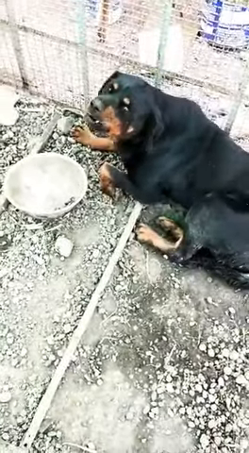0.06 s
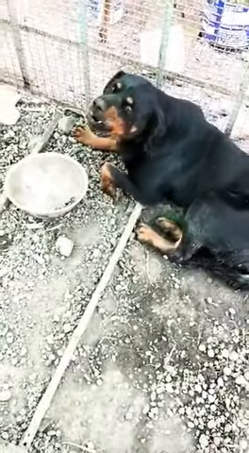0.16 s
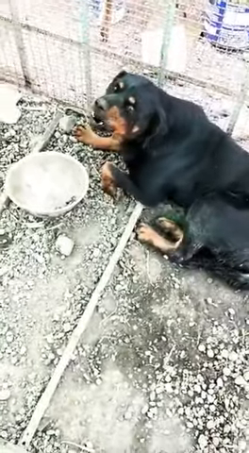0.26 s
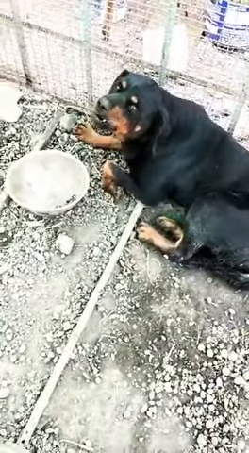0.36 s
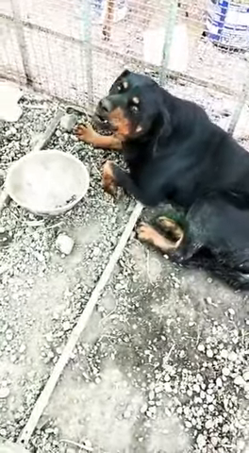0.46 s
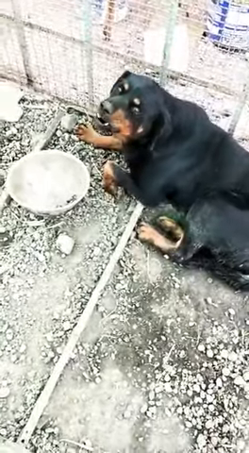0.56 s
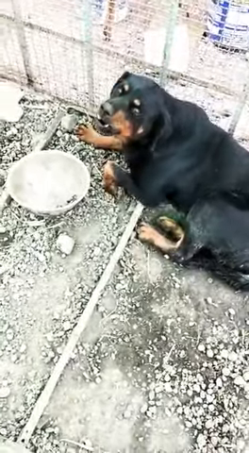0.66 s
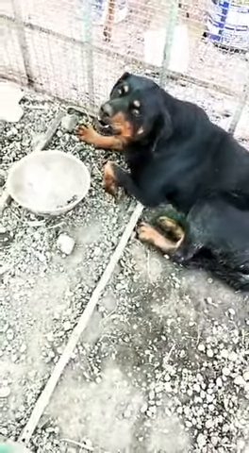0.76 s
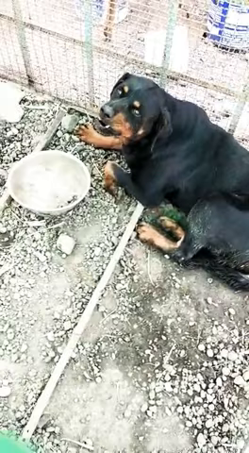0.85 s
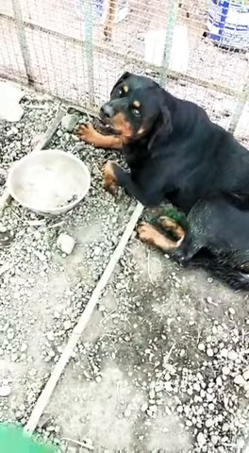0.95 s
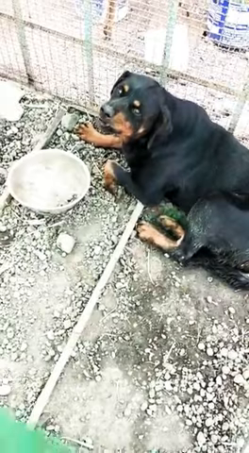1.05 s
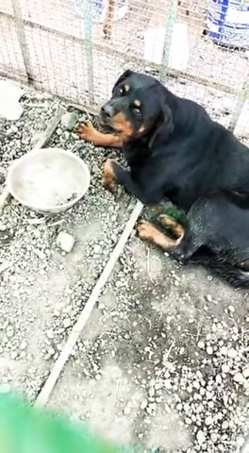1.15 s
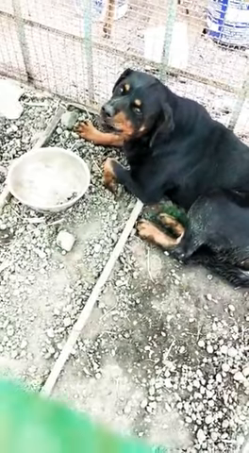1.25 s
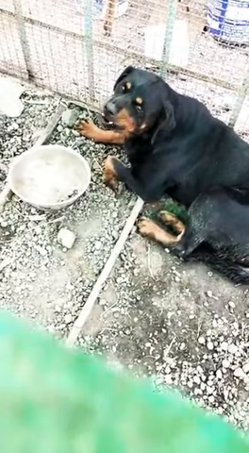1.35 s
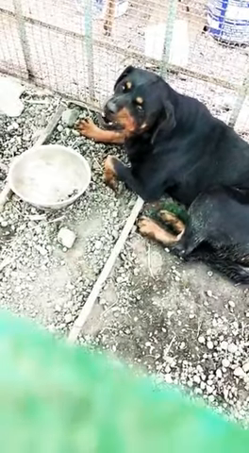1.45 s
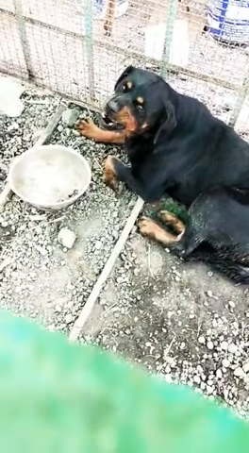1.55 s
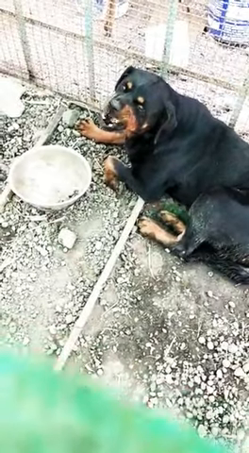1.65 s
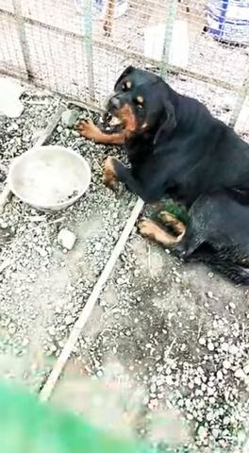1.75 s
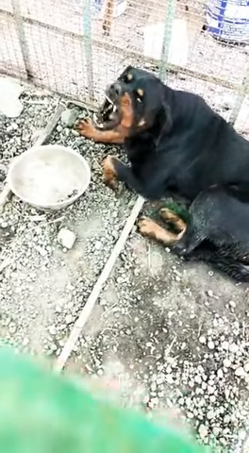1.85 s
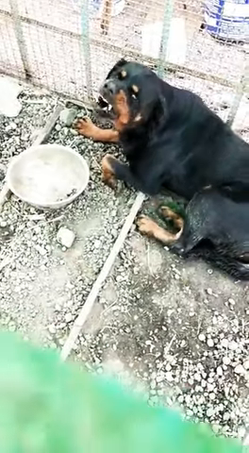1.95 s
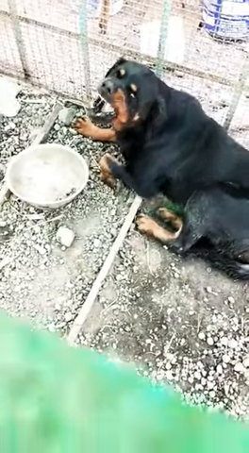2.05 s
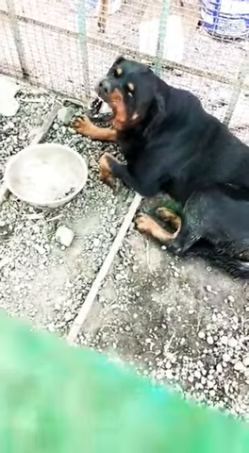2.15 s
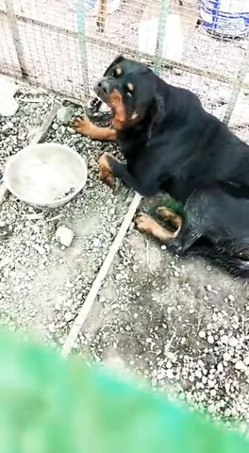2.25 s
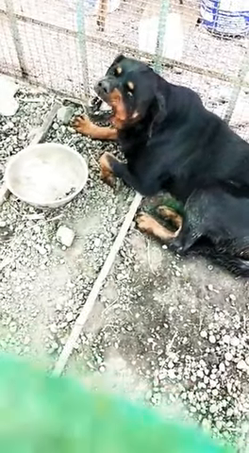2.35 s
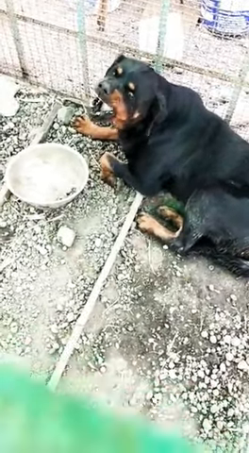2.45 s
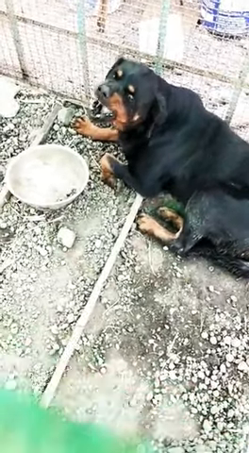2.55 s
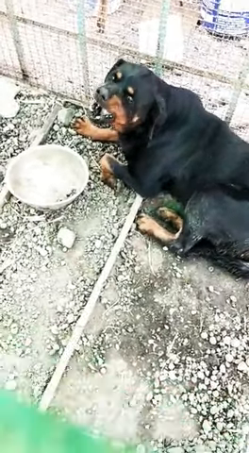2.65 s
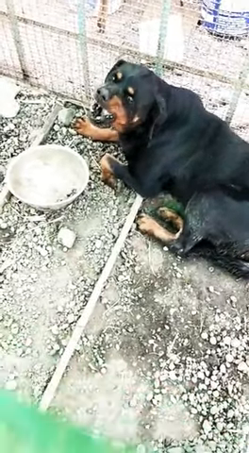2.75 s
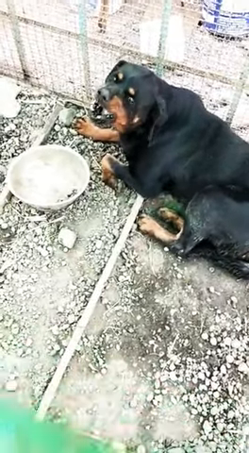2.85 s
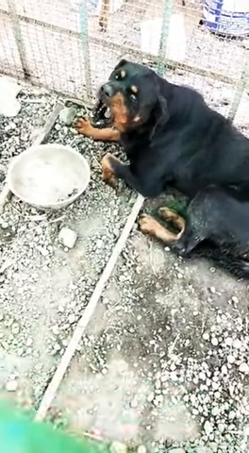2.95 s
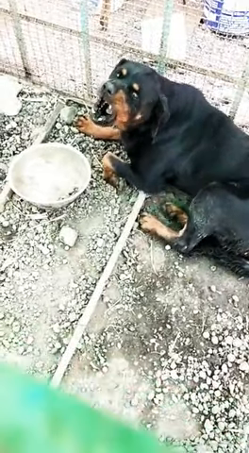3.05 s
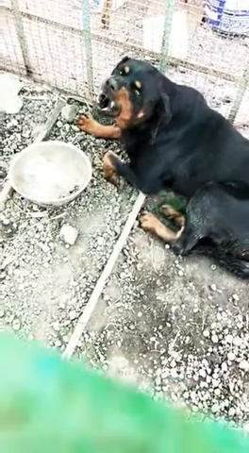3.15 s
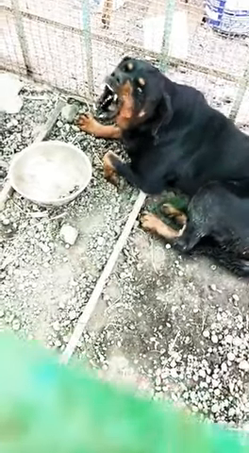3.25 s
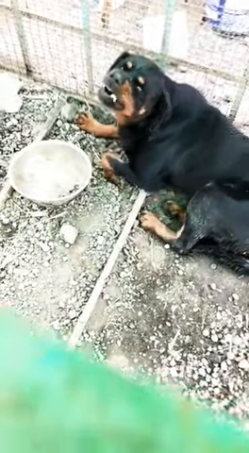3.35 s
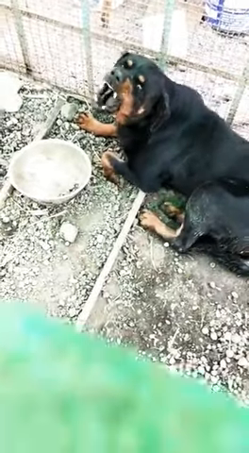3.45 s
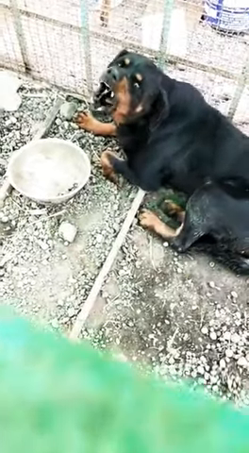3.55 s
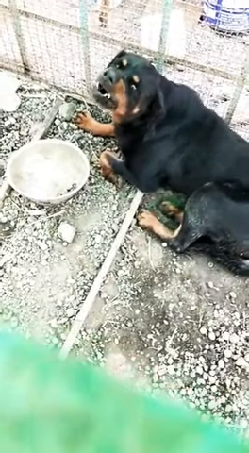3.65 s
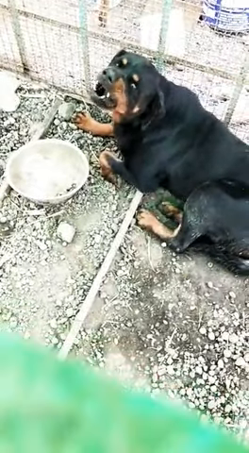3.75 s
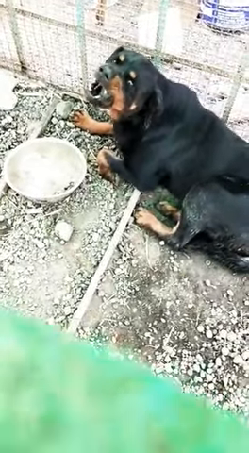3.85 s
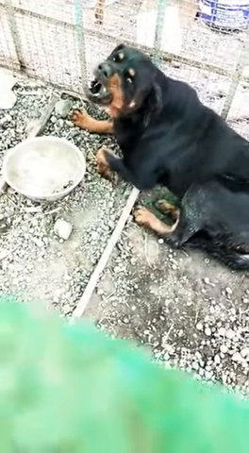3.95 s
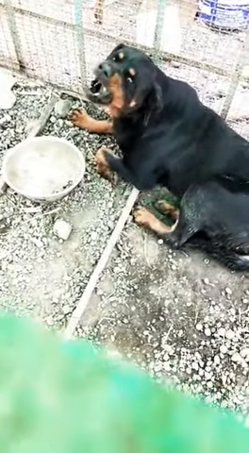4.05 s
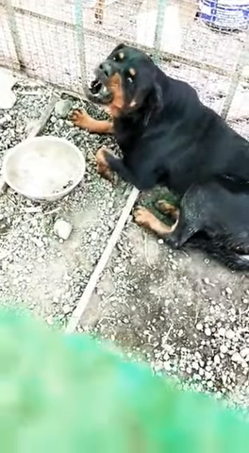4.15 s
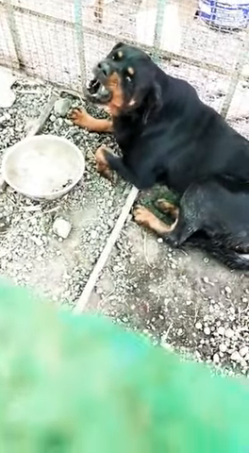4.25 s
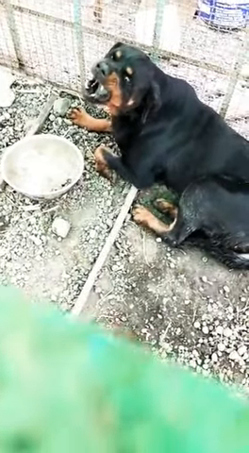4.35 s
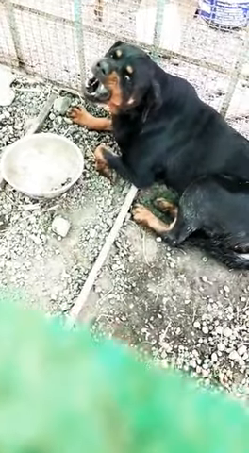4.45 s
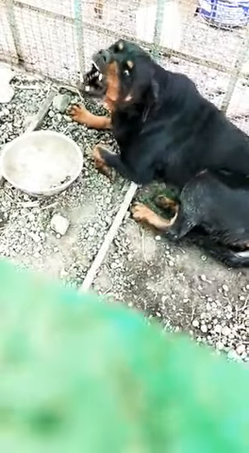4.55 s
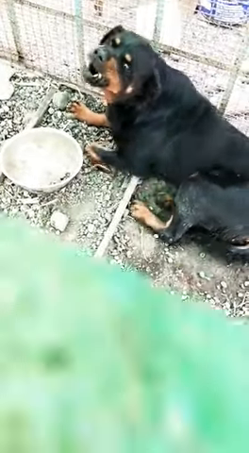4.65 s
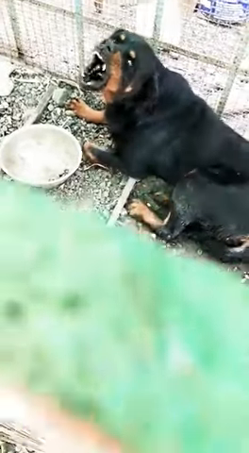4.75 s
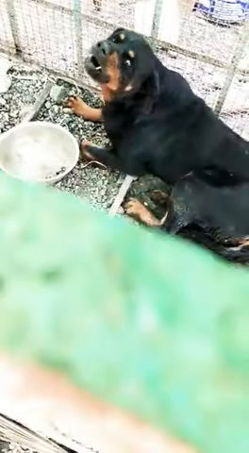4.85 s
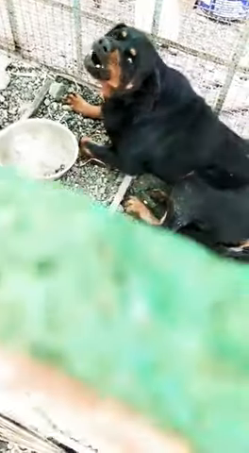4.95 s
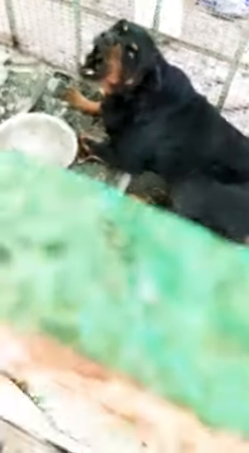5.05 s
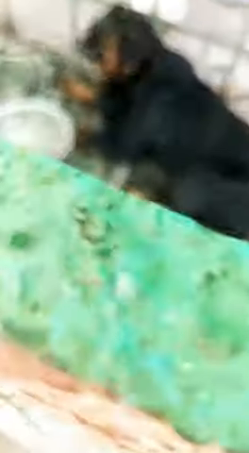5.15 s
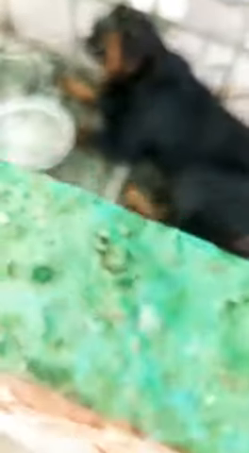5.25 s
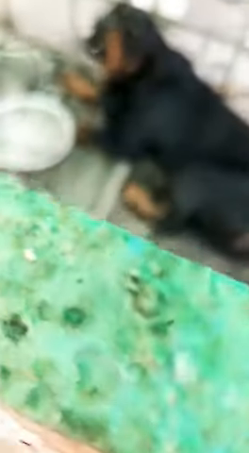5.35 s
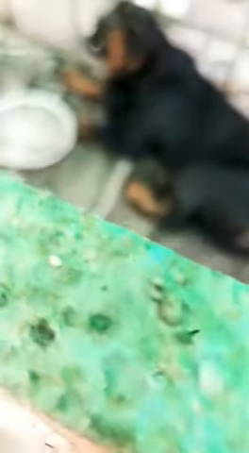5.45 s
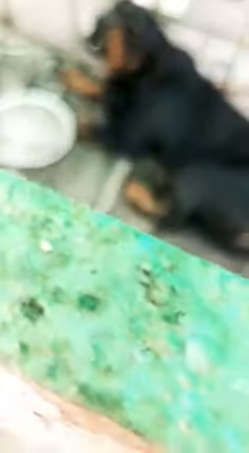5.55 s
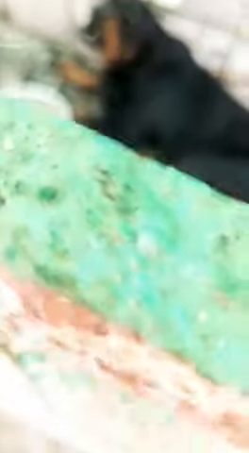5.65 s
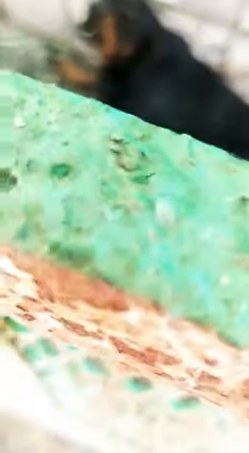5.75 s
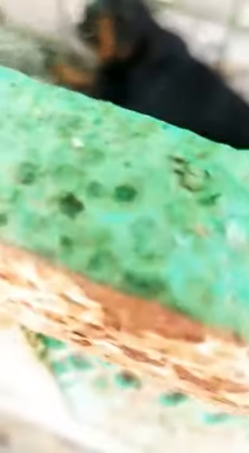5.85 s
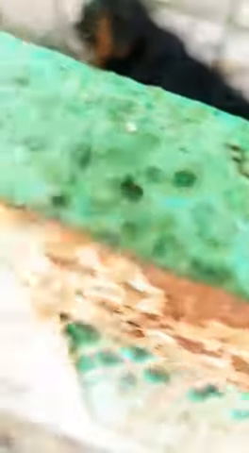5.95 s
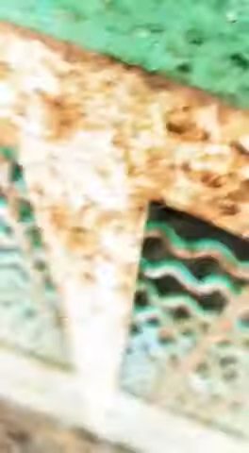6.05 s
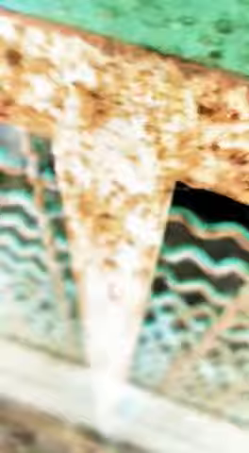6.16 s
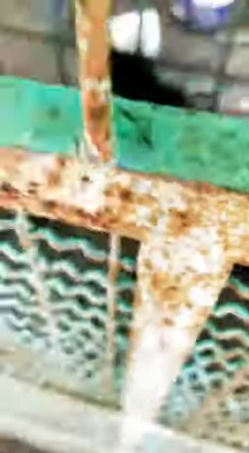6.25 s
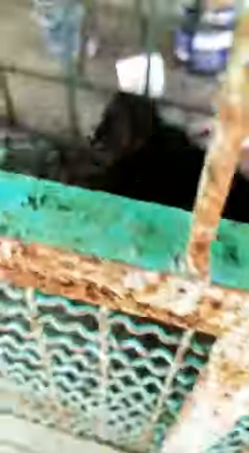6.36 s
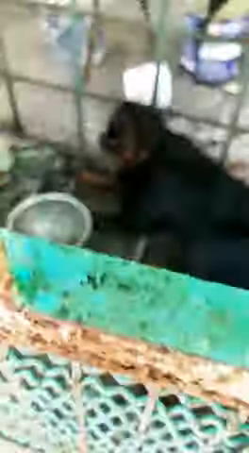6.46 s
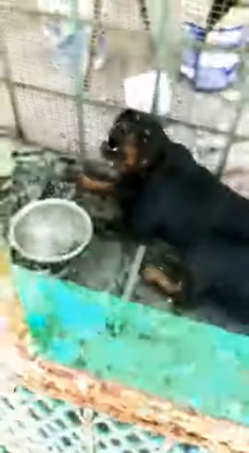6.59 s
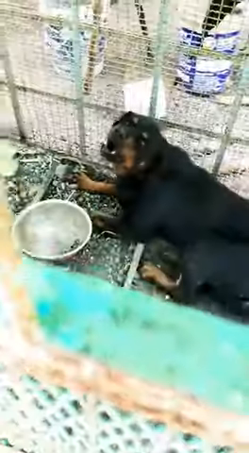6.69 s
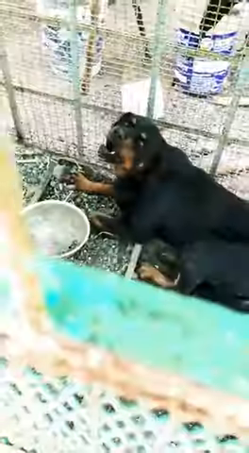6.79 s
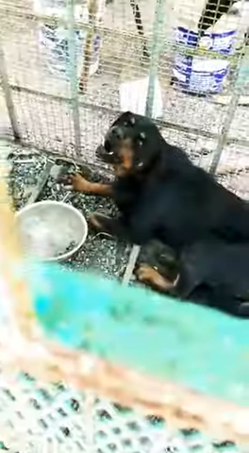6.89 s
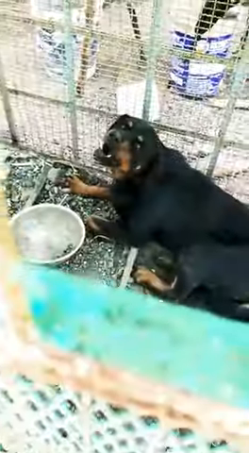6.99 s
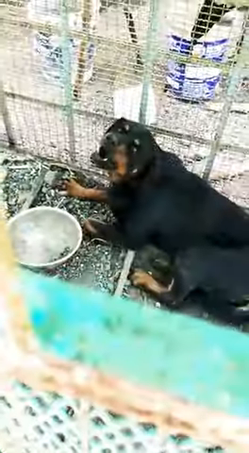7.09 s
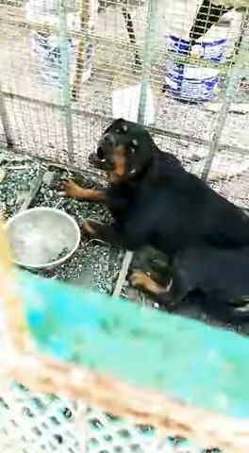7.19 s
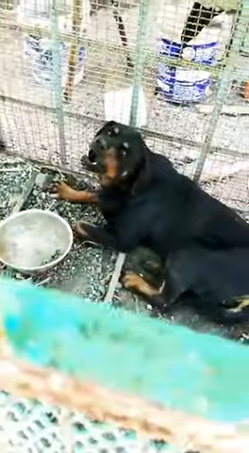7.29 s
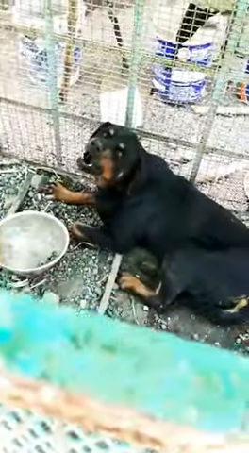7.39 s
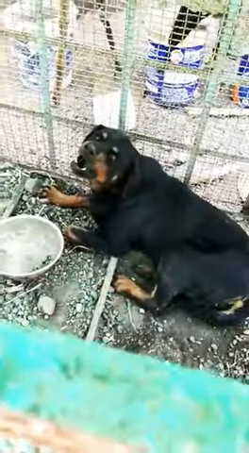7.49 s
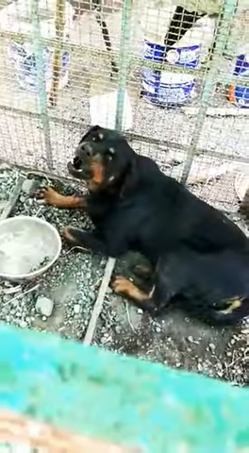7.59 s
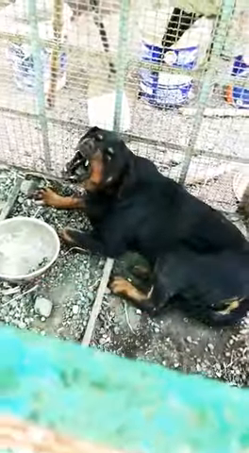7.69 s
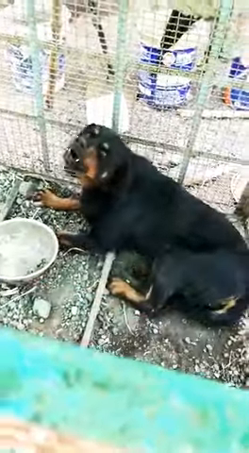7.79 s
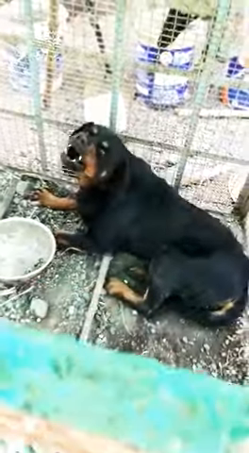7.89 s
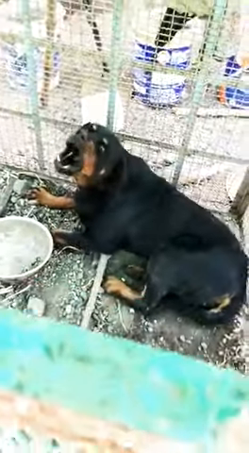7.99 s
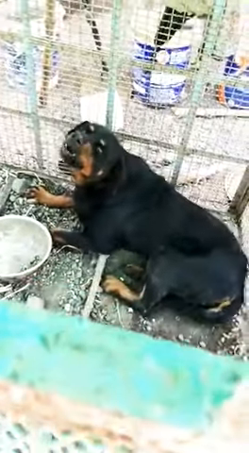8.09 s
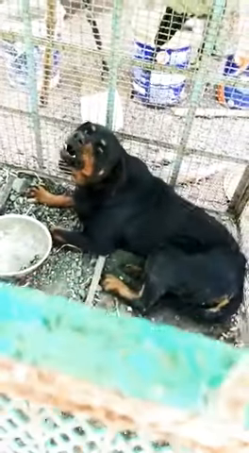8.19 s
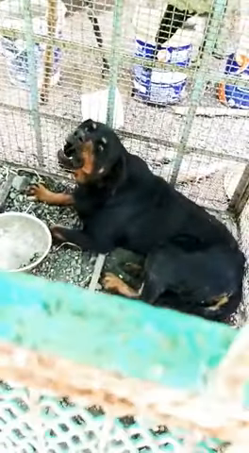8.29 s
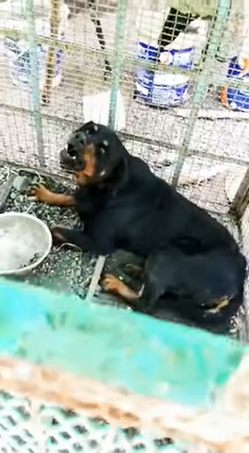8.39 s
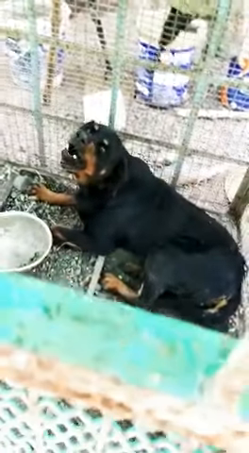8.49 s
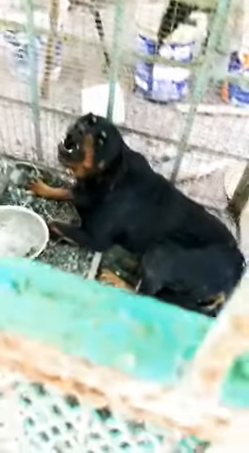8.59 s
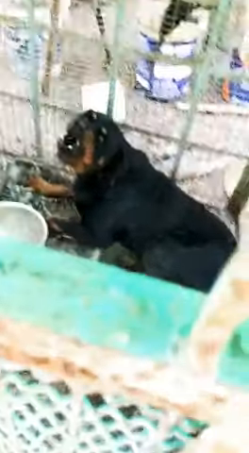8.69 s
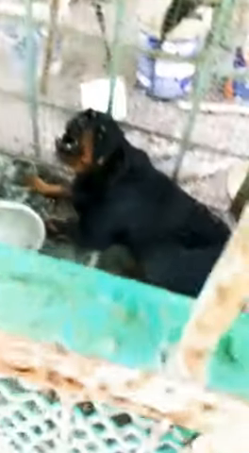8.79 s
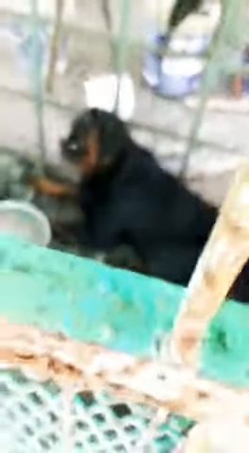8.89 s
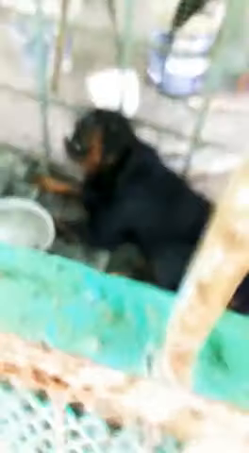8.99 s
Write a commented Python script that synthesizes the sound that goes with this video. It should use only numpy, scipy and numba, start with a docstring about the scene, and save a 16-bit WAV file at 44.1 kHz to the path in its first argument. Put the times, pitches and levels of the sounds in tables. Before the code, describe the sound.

Deep rough barks alternate with low throaty snarls from a big dog, while grit scrapes and dull close knocks gather near the end.

```python
"""A large dog in a wire pen barks and growls in turns, heard by the two microphone ports of a hand-held phone.
Barks are pulse trains with an arched pitch that turn rough; growls are a low hum under ragged throat pulses.
Ringing resonances shape both, and a metal bowl rings along. Noise makes gravel scuffs and short close ticks.
The pen adds a short scattered echo, and a faint steady noise fills the yard."""
import sys
import numpy as np
from scipy import signal
from scipy.fft import rfft, irfft
from scipy.io import wavfile
from scipy.ndimage import uniform_filter1d, map_coordinates
from numba import njit

SR = 44100
rng = np.random.default_rng(int(sys.argv[2]) if len(sys.argv) > 2 else 0)


def store_pcm(level_fs):
    """Save levels as 16-bit WAV."""
    pcm = np.round(np.clip(level_fs, -1, 1) * 32767).astype(np.int16)
    wavfile.write(sys.argv[1], SR, np.atleast_2d(pcm).T)


N = 398223

# Hoarse resonances above the mouth tones: [f/Hz, width of each pass/Hz, level/dB]
RASP = [(3537, 610, 3.5), (3910, 250, -3.5), (4360, 700, -1), (5260, 810, -4.5), (6550, 1440, -7)]
# The airy top of the voice, same columns: [f/Hz, width of each pass/Hz, level/dB]
AIR = [(6880, 1630, 11.5), (10600, 14000, -3.5), (14900, 2100, 2.5)]


def undb(db):
    """Turns decibels into a plain factor."""
    return 10 ** (np.asarray(db) / 20)


def unit(x):
    """Scales a sound to an average (RMS) level of 1."""
    return x / np.sqrt(np.mean(x ** 2))


def even(x, span_s):
    """Brings the running level to 1, so that a gain applied later sets the loudness."""
    power = uniform_filter1d(x ** 2, int(span_s * SR))
    return x / np.sqrt(power + 1e-9)


def walk(rate):
    """Random wandering with a spread near 1: values held for 1 / rate seconds, then smoothed twice."""
    hold = int(SR / rate)
    steps = np.repeat(rng.standard_normal(N // hold + 1), hold)
    smooth = uniform_filter1d(uniform_filter1d(steps, hold), hold)
    return unit(smooth)[:N]


def colour(x, table):
    """Makes each frequency louder or softer, following points of (f/Hz, level/dB)."""
    points_hz, points_db = np.transpose(table)
    f = np.arange(N // 2 + 1) * SR / N + 1
    gain_db = np.interp(np.log(f), np.log(points_hz), points_db)
    return irfft(rfft(x) * undb(gain_db), N)


def timeline(calls, levels):
    """Joins the rows of all calls into running columns; the level columns fall silent between calls."""
    t = np.arange(N) / SR
    rows = np.concatenate(calls)
    rows = rows[np.argsort(rows[:, 0])].T
    on = sum((t >= call[0][0]) & (t < call[-1][0]) for call in calls)
    on = uniform_filter1d(on.astype(float), size=200)  # avoids clicks at the ends
    running = [np.interp(t, rows[0], column) for column in rows[1:]]
    return [undb(column) * on if k in levels else column for k, column in enumerate(running)]


@njit
def svf(x, hz, width, high=False):
    """State-variable filter: a band-pass with a moving centre and gain 1 there, or a moving high-pass."""
    y, band, low = np.empty(len(x)), 0., 0.
    for i in range(len(x)):
        g = np.tan(np.pi * hz[i] / SR)
        damping = np.sqrt(2) if high else width / hz[i]
        v = (band + g * (x[i] - low)) / (1 + g * (g + damping))
        y[i] = x[i] - damping * v - low - g * v if high else damping * v
        band, low = 2 * v - band, low + 2 * g * v
    return y


def steep(x, hz, width):
    """A resonance passed twice, which makes its sides steeper."""
    return svf(svf(x, hz, width), hz, width)


def ring(x, modes, jaw=1.):
    """Adds up steep resonances of alternating sign; all shift with the jaw and wander slightly together."""
    bend = jaw * (1 + .02 * walk(4))
    total = np.zeros(N)
    for k, (hz, width, db) in enumerate(modes):
        total += (-1) ** k * undb(db) * steep(x, hz * bend, 1. * width)
    return total


def yard():
    """The quiet yard is steady coloured noise, drawn separately for left and right."""
    # Colour of the background noise: [f/Hz, level per Hz/dB]
    yard_colour = [(18, -33.5), (30, -18), (95, 15.5), (4190, -54), (5740, -25.5), (7860, -19.5),
                   (15500, -37)]
    sides = [unit(colour(rng.standard_normal(N), yard_colour)) for _ in range(2)]
    return undb(-60) * np.array(sides)


def pen(x):
    """Ground and walls scatter echoes, unlike at the two ports; their paths change as the phone moves."""
    t60_s, bass_db, treble_db = .07, -8, 2
    t = np.arange(SR // 4) / SR
    tails = rng.standard_normal((2, 2, len(t))) * 1000. ** (-t / t60_s)
    x = colour(x, [(1200, bass_db), (5000, treble_db)])  # short waves scatter most
    swing = 1.5 * walk(3)  # radians between two sets of paths
    shares = (np.cos(swing), np.sin(swing))
    sides = []
    for pair in tails:
        echoes = [signal.oaconvolve(x * share, tail / np.linalg.norm(tail))[:N]
                  for share, tail in zip(shares, pair)]
        sides.append(sum(echoes))
    return np.array(sides)


def ports(x):
    """Two microphone ports hear each frequency with their own level and phase, shifting as the phone turns."""
    # How much louder the left port is: [f/Hz, left minus right level/dB]
    port_db = [(60, -2.5), (110, -7), (200, -0.5), (380, -14.5), (700, -2.5), (1290, -3.5), (2380, -8.5),
               (4400, -6), (8120, -5), (15000, 0.5)]
    # How far the wave at the left port is ahead: [f/Hz, lead of the left/radians]
    port_lead = [(0, 0), (600, 0.0), (1890, -3.0), (2670, -0.7), (2930, 1.7), (3700, 3.1), (5000, 1.7),
                 (5340, -0.3), (5680, 0.7), (6630, -2.5), (6890, -1.3), (12100, -5.9), (15300, -15.3),
                 (16300, -16.1)]
    # Extra balance as the phone turns: [t/s, further left minus right level/dB]
    pan_points = [(0, 2), (.8, 1.5), (1.7, 5.5), (2.3, 2.5), (3.6, 3.5), (4.3, 1.5), (5.2, 6), (5.7, 0),
                  (6.3, 7), (7.2, 1), (8, 7), (9, -6)]
    # Extra delay as the phone turns: [t/s, further lag of the left/ms]
    turn_points = [(0, 0), (6, 0), (7.2, -.08), (7.6, -.3), (8.4, -.3), (8.7, .25)]
    f, t = np.arange(N // 2 + 1) * SR / N, np.arange(N) / SR
    points_hz, points_db = np.transpose(port_db)
    difference_db = np.interp(np.log(f + 1), np.log(points_hz), points_db)
    lead = np.interp(f, *np.transpose(port_lead))
    half = undb(difference_db / 2) * np.exp(.5j * lead)  # each side takes half of the difference
    pan = undb(np.interp(t, *np.transpose(pan_points)) / 2)
    lag_ms = np.interp(t, *np.transpose(turn_points))
    spectrum = rfft(x)
    left = map_coordinates(irfft(spectrum * half, N), [(t - lag_ms / 1000) * SR], order=3)
    right = irfft(spectrum / half, N)
    return np.array([pan * left, right / pan])


def ticks():
    """Short ticks, scrapes and dull knocks, as of grit, wire or a hand on the fence: ringing noise bursts."""
    # Each tick: [start t/s, peak level/dB, centre f/Hz, width of each pass/Hz, time to fall by 60 dB/s]
    tick_table = [(1.159, -34.5, 6910, 2800, 0.05), (1.6, -31, 3300, 1406, 0.036),
                  (1.62, -27, 3220, 884, 0.032), (1.667, -21.5, 3120, 1102, 0.033),
                  (1.732, -26.5, 2760, 800, 0.037), (1.826, -44, 3420, 1200, 0.025),
                  (5.7705, -15, 7960, 11000, 0.016), (5.782, -17, 6500, 7005, 0.071),
                  (5.819, -26, 9000, 13000, 0.2), (5.837, -25, 8950, 13000, 0.1),
                  (5.909, -26, 9000, 9000, 0.013), (5.914, -28, 6500, 6000, 0.012),
                  (5.931, -21, 8000, 11000, 0.014), (5.9455, -32, 13500, 7000, 0.014),
                  (8.327, -24.5, 7000, 2021, 0.056), (8.348, -20.5, 3100, 900, 0.047),
                  (8.391, -27, 3236, 892.4, 0.044), (8.482, -25, 7085, 1208, 0.0409),
                  (8.5374, -19, 4272, 2789, 0.06), (8.545, -13, 556, 600, 0.063),
                  (8.609, -15, 4330, 3200, 0.13), (8.789, -12, 537, 500, 0.037),
                  (8.83, -7.5, 527, 495.6, 0.094), (8.919, -8, 3870, 2800, 0.08),
                  (8.982, -8, 445, 501, 0.026)]
    rise_s = 0.0012
    out, t = np.zeros(N + 8000), np.arange(8000) / SR
    for start_s, db, hz, width_hz, t60_s in tick_table:
        noise = rng.standard_normal(len(t))
        burst = steep(noise, np.full(len(t), 1. * hz), 1. * width_hz)
        burst *= 1000. ** (-t / t60_s) * np.minimum(t / rise_s, 1)
        out[int(start_s * SR):][:len(t)] += undb(db) * burst / np.abs(burst).max()
    return out[:N]


def scuff_shape(start, rise, hold, fall, db, rumble_db):
    """One scuff swells, holds and dies away: rows of (t/s, treble level/dB, rumble against it/dB)."""
    t = start + np.cumsum([0, rise, hold, fall])
    level_db = db - 13.5 * np.array([1, 0, 0, 1])  # softer at both ends
    return np.transpose([t, level_db, np.full(4, rumble_db)])


def scuffs():
    """Moving gravel is noise of quickly changing strength, spread wide, over a soft low rumble."""
    # Each scuff: [start t/s, rise/s, hold/s, fall/s, treble level/dB before a shared lift, rumble against it/dB]
    scuff_table = [(1.541, 0.061, 0.16, 0.11, -37.5, 5.5), (5.762, 0.006, 0.086, 0.02, -42, 4),
                   (8.302, 0.023, 0.12, 0.11, -34, 8.5), (8.503, 0.079, 0.44, 0.029, -26, 4.5)]
    # Colour of the gravel grains: [f/Hz, level per Hz/dB]
    grain_colour = [(240, -51), (400, 6), (496, -1.5), (560, 0), (749, 1), (1710, -13.5), (2320, -10),
                    (5910, -20), (7210, -17.5), (15500, -30)]
    gain, rumble_gain = np.zeros(N), np.zeros(N)
    for row in scuff_table:
        level, rumble_db = timeline([scuff_shape(*row)], [0])
        gain += level
        rumble_gain += level * undb(rumble_db)
    grains = rng.standard_normal((2, N)) * undb(2.2 * walk(250) + walk(40))
    gravel = np.array([unit(colour(side, grain_colour)) for side in grains])
    uneven = rng.standard_normal(N) * undb(2.4 * walk(35))
    rumble = unit(colour(uneven, [(40, -16), (110, 4.0), (350, 2.0), (500, -9.0), (800, -55.0)]))
    return gain * undb(6.0) * gravel + rumble_gain * rumble * [[.7], [1.3]]


def bowl(dog):
    """A metal bowl rings along with the voice through a narrow resonance."""
    # The bowl's tone: [f/Hz, width/Hz, level/dB]
    bowl_modes = [(750, 12, -1)]
    return sum(undb(db) * svf(dog, np.full(N, 1. * hz), 1. * width) for hz, width, db in bowl_modes)


@njit
def folds(hz, rough, chance, jitter, shimmer, limp):
    """A pulse at each closing of the folds; roughness scatters length and size and weakens every second one."""
    pulses, puff = np.zeros(len(hz) + 1), np.empty(len(hz))
    phase, k = 0., 0
    for i in range(len(hz)):
        step = hz[i] * np.exp(jitter * rough[i] ** 2 * chance[k, 0]) / SR
        scatter = shimmer * rough[i]
        size = np.exp(scatter * (chance[k, 1] - scatter)) * (1 - limp * rough[i] * (k % 2))
        phase += step
        if phase >= 1:
            phase, k = phase - 1, k + 1
            # the pulse falls between two samples, so they share it
            height = size / np.sqrt(hz[i] / SR)
            pulses[i] += height * phase / step
            pulses[i + 1] += height * (1 - phase / step)
        puff[i] = size * np.exp(-3 * phase)
    return pulses[:-1], puff


def larynx(hz, rough, jitter, shimmer, limp, breathy):
    """The voice source: pulses of the vocal folds plus the noisy puff of air let through each cycle."""
    chance = rng.standard_normal((N // 40, 2))
    pulses, puff = folds(hz, rough, chance, jitter, shimmer, limp)
    breath = unit(puff) * rng.standard_normal(N)
    return pulses + breathy * rough ** 2 * breath, breath


def voice(throat, upper, span_s):
    """Adds higher resonances, given as (source, modes, level against the throat/dB, jaw), to the throat."""
    total = even(throat, span_s)
    for source, modes, db, jaw in upper:
        total = total + undb(db) * even(ring(source, modes, jaw), span_s)
    return total


def growl_shape(call, colours):
    """One growl as rows of time, pitch and levels, in the order in which growls() unpacks them."""
    t, hz, db, snarl = np.transpose(call)
    hum, octave, mouth, cheek, narrow_hz, broad_hz, *upper, low = colours
    below = db - db.max()
    # the hum follows the throat a little, then fades with it once it has sunk 12.5 dB
    hum = hum + 0.061 * below + 0.96 * np.minimum(below + 12.5, 0)
    opening = 0.57 * snarl  # dB
    return np.transpose([t, hz, hum, hum + octave, db, mouth + opening, cheek + opening,
                         np.full(len(t), narrow_hz), np.full(len(t), broad_hz),
                         *(level + snarl for level in upper), np.full(len(t), low)])


def growls():
    """A wavering chest hum; slack folds slap unevenly above it while the soft palate flutters."""
    # One inner table for each growl: [t/s, hum f/Hz, throat level/dB, snarl against the throat/dB]
    growl_table = [
        [(0.1, 223.6, -25.5, -4), (0.206, 202.2, -20, -1), (0.296, 171.6, -30, 6.5), (0.41, 139.6, -32.5, -1.5),
         (0.49, 123.8, -54.5, 9)],
        [(0.495, 145.4, -39, -6), (0.512, 150, -41, -2), (0.552, 135.1, -24.5, -7.5), (0.599, 116.8, -39, 9),
         (0.757, 107.9, -39.5, -1), (0.891, 93.16, -47.5, 1.5), (1.05, 84.65, -65.5, -8)],
        [(1.055, 95.8, -64.5, 4), (1.069, 94.9, -51.5, 0.5), (1.145, 93.8, -37.5, -2), (1.27, 93.7, -45, 2),
         (1.33, 93.35, -48, 1), (1.53, 93.2, -50, 1.5), (1.611, 96.2, -38.5, -15), (1.751, 105.1, -41.5, -5),
         (1.83, 112, -18, -12)],
        [(2.06, 201.7, -35, -10), (2.154, 205, -19, -5.5), (2.228, 183.4, -19, 1), (2.312, 179.8, -21, 2),
         (2.476, 155.3, -25.5, 6), (2.604, 121.5, -26.5, 1.5), (2.738, 129.9, -19, -3.5),
         (2.86, 114.4, -25, -1.5), (2.93, 106.5, -45, 3)],
        [(3.815, 130.8, -29, -2), (3.827, 131.3, -22.5, -8), (3.873, 131.7, -18.5, 0), (4.191, 139.1, -20.5, 2),
         (4.345, 159.5, -21.5, 5), (4.463, 141.1, -17.5, -4), (4.52, 128.7, -24, -4), (4.55, 127.4, -46.5, 6)],
        [(5.31, 127.6, -32, -2), (5.374, 131, -19, 0), (5.496, 139, -19.5, 2), (5.656, 111.3, -30.5, 6),
         (5.858, 91.36, -32.5, 2.5), (5.93, 90.3, -50.5, 14)],
        [(5.935, 103.8, -52, -3), (5.961, 168.3, -37.5, -2.5), (6.023, 176.2, -37.5, 1), (6.2, 140.6, -46, 5),
         (6.255, 145.1, -42.5, 3), (6.29, 151.2, -25.5, -20), (6.37, 162.9, -31.5, -1)],
        [(6.59, 172, -34.5, -2), (6.64, 160.1, -21, -6), (6.72, 134, -34.5, 2.5), (6.795, 125.8, -44.5, 3)],
        [(6.796, 123, -43, 5.5), (6.902, 123.6, -28.5, 5.5), (7.056, 100.6, -32, 3), (7.28, 109.4, -27.5, -2.5),
         (7.498, 110.4, -30.5, 6.5), (7.62, 129.9, -27, 8.5), (7.71, 133.8, -31, 4.5)],
        [(8.17, 235.2, -53, 0), (8.2, 222.4, -21, -21.5), (8.31, 202.5, -33.5, -4), (8.34, 198, -47, 13)],
        [(8.35, 140, -48, 8), (8.41, 138.4, -41, 8), (8.52, 138.9, -36, 8), (8.7, 150.6, -22, -7),
         (8.86, 156.9, -27, 4.5), (9.03, 161.6, -26.5, 5.5)],
    ]
    # Colour of each growl: [highest hum level/dB, octave against the hum/dB, mouth level/dB, cheek level/dB,
    # narrow snout f/Hz, broad snout f/Hz, narrow snout level/dB, broad snout level/dB, rasp level/dB,
    # air level/dB, low throat level/dB]; from the mouth on, levels are against the throat, before snarl and sway
    growl_colours = [(-35, -17, -16, -14, 2170, 2800, -19.5, -48, -27.5, -42, -4),
                     (-40.5, -8.5, -10.5, -14.5, 2220, 2800, -8, -25, -16, -23, -7.5),
                     (-33, -13, -7.5, -0.5, 2220, 2686, -5, -47, -13.5, -14.5, -6.5),
                     (-35, -11, -11, -6.5, 2171, 2700, -14.5, -14, -15.5, -20, -10),
                     (-34.5, -8, -13, -12, 2118, 2627, -22, -14.5, -14, -23.5, -12.5),
                     (-34.5, -9.5, -13, -17.5, 2150, 2702, -19, -25.5, -16, -22.5, -8),
                     (-38, -13.5, -7, -10, 2160, 2100, -2.5, -39, -14, -27, -5.5),
                     (-37, -2.5, -7.5, -11.5, 2220, 3100, -13.5, -25.5, -24, -27, -2.5),
                     (-34.5, -10.5, -12.5, -31, 2341, 3057, -14.5, -27, -18.5, -26.5, -5),
                     (-37.5, 13.5, -0.5, -10, 2350, 2540, -4, -10, -9, -9.5, -4),
                     (-31, -31, -18.5, -11.5, 2270, 2399, -17, -14.5, -14, -14, -3.5)]
    # Throat resonances: [f/Hz, width of each pass/Hz, level/dB]
    throat_modes = [(582, 81.5, 1.5), (675, 67, -13)]
    # Deeper throat resonances: [f/Hz, width of each pass/Hz, level/dB]
    low_throat_modes = [(427.8, 76, 0.5), (303.3, 45, -8.5)]
    # The mouth with the jaws nearly closed: [f/Hz, width of each pass/Hz, level/dB]
    shut_modes = [(1053, 394, 3.5), (1241, 66, 4.5)]
    # The cheek resonance: [f/Hz, width of each pass/Hz, level/dB]
    cheek_modes = [(1453, 515, 0)]
    shapes = [growl_shape(*pair) for pair in zip(growl_table, growl_colours)]
    (hz, hum_gain, octave_gain, gain, mouth_db, cheek_db, narrow_hz, broad_hz,
     narrow_db, broad_db, rasp_db, air_db, low_db) = timeline(shapes, [1, 2, 3])

    turn = 2 * np.pi * np.cumsum(hz * (1 + .035 * walk(40))) / SR
    tones = hum_gain * np.sin(turn) + octave_gain * np.sin(2 * turn)
    hum = np.sqrt(2) * undb(2.8 * walk(25)) * tones
    chest_colour = [(40, -28), (100, -7.0), (250, -10.0), (350, -34.0)]
    chest = np.array([unit(colour(rng.standard_normal(N), chest_colour)) for _ in range(2)])

    source, breath = larynx(hz, np.ones(N), jitter=.18, shimmer=.26, limp=.2, breathy=.9)
    source = source + .8 * rng.standard_normal(N)  # air streaming past the slack folds
    flutter_hz = 43.2 * (1 + .25 * walk(20))
    flutter = 1 + .3 * np.sin(2 * np.pi * np.cumsum(flutter_hz) / SR)
    hiss = breath + .6 * rng.standard_normal(N)

    def sway():
        """Each set of resonances swells and sinks alone, in dB, as the lips curl."""
        return 0.48 * walk(7)

    upper = [(-flutter * source, low_throat_modes, low_db + sway(), 1.),
             (source, shut_modes, mouth_db + sway(), 1.),
             (source, cheek_modes, cheek_db + sway(), 1.),
             (-hiss, [(narrow_hz, 260, 0)], narrow_db + 1.7 * sway(), 1.),
             (hiss, [(broad_hz, 620, 0)], broad_db + sway(), 1.),
             (-hiss, RASP, rasp_db + sway(), 1.),
             (hiss, AIR, air_db + 1.2 * sway(), 1.)]
    rattle = voice(flutter * ring(source, throat_modes), upper, span_s=0.098)
    return hum + gain * rattle, undb(-2) * hum_gain * chest


def bark_shape(row, even_span, next_s):
    """One bark, cut off by the next, as rows of time, pitch, roughness and levels, as barks() unpacks them."""
    # Steps added at the start, after the attack, at the top, halfway down and at the end
    # Whole bark: [level/dB]
    bark_steps = [-2.5, 5, 0.5, -1.5, -8]
    # Mouth: [level/dB]
    mouth_steps = [-15, 5, -3, 2.5, -0.5]
    # Lips: [level/dB]
    lips_steps = [-4.5, 2, 3.5, 0, -7]
    # Bite: [level/dB]
    bite_steps = [16, 1, -6, -19, -4]
    # Air: [level/dB]
    air_steps = [5, -4, 5, -0.5, -5.5]
    palate_steps = [-4.5, 2, 4, -4, -3]  # dB
    (start, attack, rise_s, fall_s, tail_s, first_hz, top_hz, last_hz, throat_hz, db, dip, tail_db,
     mouth, bite, air, gasp, lips, lips_hz, palate, palate_hz) = row
    top, end, tail = start + np.cumsum([rise_s, fall_s, tail_s])
    t = np.arange(start, min(tail, next_s), .002)

    # the pitch arches up and down, then sags in the tail
    before = np.clip((top - t) / (top - start), 0, 1)
    after = np.clip((t - top) / (end - top), 0, 1)
    rise = (top_hz - first_hz) * before ** 1.6
    fall = (top_hz - last_hz) * after ** 1.8
    hz = (top_hz - rise - fall) * np.interp(t, [end, tail], [1, 0.83])

    # the folds run evenly about the top; full roughness returns within fade_s
    from_s, to_s, top_rough = even_span
    fade_s = .035
    edges = top + np.array([from_s - fade_s, from_s, to_s, to_s + fade_s])
    rough = np.interp(t, edges, [1, top_rough, top_rough, 1])

    marks = [start, start + attack, top, (top + end) / 2, end, tail]

    def shape(base, steps, last):
        """Joins the stepped levels and the level at the end of the tail by straight lines, in dB."""
        return np.interp(t, marks, [*(base + np.array(steps)), last])

    level = shape(db, bark_steps, db + tail_db)
    level += np.interp(t, marks[:4], [-250 * attack, 0, dip, 0])  # a slower attack starts softer
    # most of the level goes in the first part of the tail
    ceiling = np.interp(t, [end, end + 0.28 * tail_s], [db, db + 0.75 * tail_db])
    level = np.minimum(level, ceiling)

    # the throat resonance follows the pitch, then relaxes to 637 Hz in the tail
    rest = np.interp(t, [end, tail], [0, 1])
    throat = (throat_hz - .4 * rise - .8 * fall) * (1 - rest) + 637 * rest
    jaw = (hz / top_hz) ** 0.22
    return np.transpose([t, hz, rough, throat, level, jaw, shape(mouth, mouth_steps, mouth),
                         np.full(len(t), lips_hz), shape(lips, lips_steps, lips - 3),
                         shape(bite, bite_steps, gasp), shape(air, air_steps, gasp - 10),
                         np.full(len(t), palate_hz), shape(palate, palate_steps, palate - 8)])


def barks():
    """Even cycles sing pitch and octave; limping ones put a line halfway between, where the throat rings."""
    # Each bark, before bark_shape() adds its steps: [start t/s, attack/s, rise to the top/s, fall/s, tail/s,
    # first f/Hz, top f/Hz, last f/Hz, throat f at the top/Hz, level/dB, dip at the top/dB, tail level/dB,
    # mouth level/dB, bite level/dB, air level/dB, gasp level in the tail/dB, lips level/dB, lips f/Hz,
    # palate level/dB, palate f/Hz]; tail against the level, mouth to palate against the throat
    bark_table = [ (-0.085, 0.09, 0.09, 0.071, 0.034, 310, 369.7, 240, 640, -8.5, -5, -20, -10.5, -38, -38.5, -15, -10.5, 1490, -20, 1900),
                  (1.823, 0.023, 0.099, 0.097, 0.071, 270.2, 366.2, 229.4, 641, -9, -4.5, -22, -14.5, -50, -40, -47, -13.5, 1816, -24, 1500),
                  (2.934, 0.039, 0.12, 0.093, 0.076, 199.1, 390.7, 235.6, 615, -12.5, 17, -11, -9, -27, -32.5, -9.5, -7.5, 1590, -11, 1900),
                  (3.226, 0.0069, 0.11, 0.096, 0.069, 292.4, 386.3, 259.3, 591, -10.5, -3, -15.5, -16, -26.5, -36, -6.5, -12.5, 1590, -25.5, 1840),
                  (3.491, 0.021, 0.098, 0.086, 0.14, 268.2, 323.2, 205.8, 622.5, -8.5, -4.5, -25.5, -18, -28, -41, -36, -14, 1660, -23.5, 1949),
                  (4.553, 0.0087, 0.073, 0.11, 0.052, 340, 389.6, 281.5, 582, -10, 4, -17, -14.5, -32.5, -41, -7.5, -18.5, 1580, -21.5, 1964),
                  (4.783, 0.0091, 0.079, 0.1, 0.078, 297.3, 375.2, 267.3, 551, -8, -3, -19, -34, -40, -40.5, -10.5, -19, 1350, -24.5, 1750),
                  (5.03, 0.031, .095, .065, .12, 264.7, 417.4, 290.6, 581, -10, -3.5, -23.5, -22, -36, -40.5, -28, -24, 1350, -16.5, 1784),
                  (6.366, 0.017, 0.12, 0.092, 0.028, 285.3, 379.8, 209.2, 577, -12, -1.5, -16, -12, -30.5, -39, -34, -14, 1493, -25, 1760),
                  (7.715, 0.0065, 0.079, 0.11, 0.087, 330.2, 395.8, 290.9, 554, -9, -4, -19.5, -17, -22, -40.5, -5, -17, 1250, -31, 1820),
                  (7.962, 0.015, .11, 0.064, 0.049, 273.4, 359.6, 271, 556, -7, -7.5, -12.5, -17, -25, -39.5, -25, -20, 1220, -36, 1730),
                  ]
    # Where each bark runs evenly: [from t against the top/s, to t against the top/s, roughness there/0-1]
    even_spans = [(-.04, .025, .2), (-.025, .045, .36), (-.06, .03, .32), (-.02, .045, .72),
                  (-.005, .035, .2), (-.04, .1, .76), (-.04, .08, .8), (-.02, .05, .7), (.005, .045, .36),
                  (-.02, .07, .72), (-.04, .06, .62)]
    # Resonances of the open mouth: [f/Hz, width of each pass/Hz, level/dB]
    mouth_modes = [(917, 320, -42), (1082, 198, 22), (1197, 33, 27), (1415, 630, 10.5)]
    # Resonances that give bite: [f/Hz, width of each pass/Hz, level/dB]
    bite_modes = [(2215, 290, 1.5), (2657, 210, -4.5)]
    next_starts = [row[0] for row in bark_table[1:]] + [N / SR]
    calls = [bark_shape(*bark) for bark in zip(bark_table, even_spans, next_starts)]
    (hz, rough, throat_hz, gain, jaw, mouth_db, lips_hz, lips_db, bite_db, air_db,
     palate_hz, palate_db) = timeline(calls, [3])
    source, breath = larynx(hz, rough, jitter=.08, shimmer=.36, limp=.8, breathy=.6)

    # roughness weakens pitch and octave and brings up the line between them
    pitch_line = undb(-8.0 - 5 * rough ** 2) * steep(source, 0.972 * hz, 89.0)
    octave_line = undb(-17 * rough ** 2) * steep(source, 2 * hz, 216.0)
    throat_line = undb(5.0) * rough * steep(source, throat_hz, 143.5)
    throat = pitch_line + octave_line + throat_line

    hiss = breath + .9 * source
    hoarse = source + (.18 + .25 * rough) * breath
    upper = [(hoarse, mouth_modes, mouth_db, jaw),
             (hoarse, [(lips_hz, 163, 0)], lips_db, jaw),
             (-hoarse, [(palate_hz, 240, 0)], palate_db, jaw),
             (-hiss, bite_modes, bite_db, 1.),
             (hiss, RASP, air_db + 3.0, 1.),
             (hiss, AIR, air_db, 1.)]
    bark = gain * voice(throat, upper, span_s=0.023)
    # two high-passes weaken what lies below the pitch
    edge_hz = .78 * hz
    return svf(svf(bark, edge_hz, 1., True), edge_hz, 1., True)


def scene():
    """Puts dog, bowl and ticks before the ports and in the pen, then adds chest, gravel and yard."""
    growl, chest = growls()
    dog = barks() + growl
    near, ticking = dog + bowl(dog), ticks()
    direct = ports(near + ticking)
    echo = pen(near + .3 * ticking)  # the ticks are so close that little of them comes back
    # the chest rumble comes off the whole body and the ground, so the ports hear it unlike
    return direct + echo + chest + scuffs() + yard()


def record(dry):
    """The phone rounds the loudest peaks, weakens the deep bass and cuts the top."""
    ceiling, bass_hz, top_hz = .9, 75, 15800
    rounded = dry / (1 + (dry / ceiling) ** 4) ** (1 / 4)
    thin = signal.sosfilt(signal.butter(3, bass_hz, "high", fs=SR, output="sos"), rounded)
    return signal.sosfilt(signal.ellip(10, .2, 80, top_hz, fs=SR, output="sos"), thin)


dry = scene()
out = record(dry)
store_pcm(out)
```